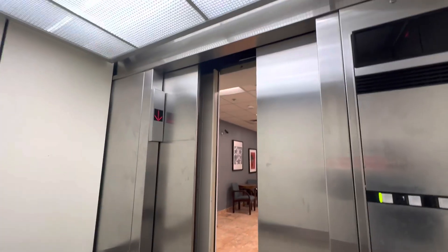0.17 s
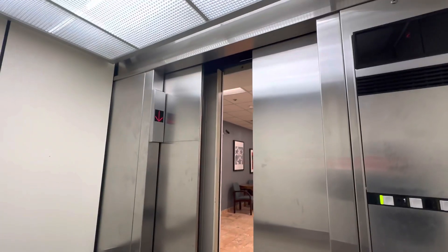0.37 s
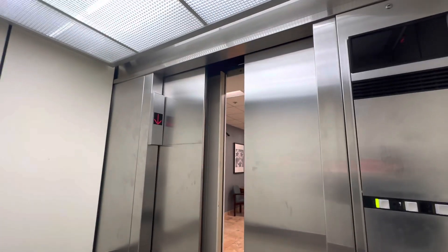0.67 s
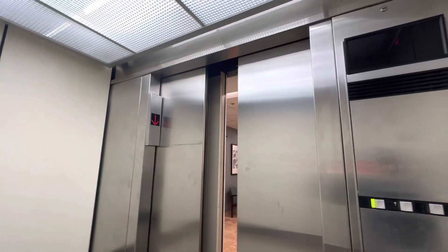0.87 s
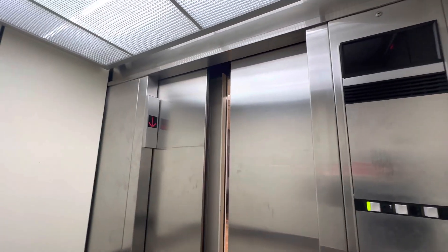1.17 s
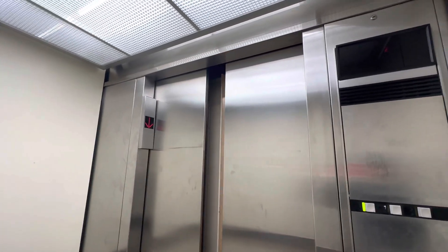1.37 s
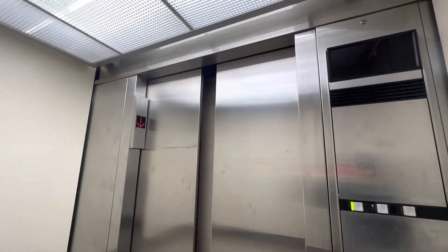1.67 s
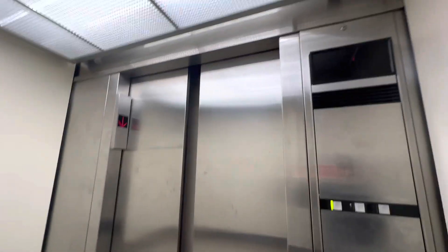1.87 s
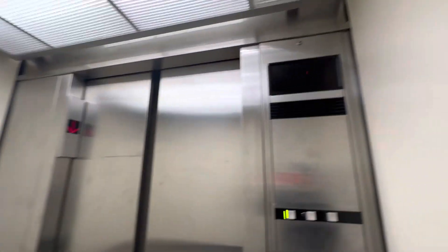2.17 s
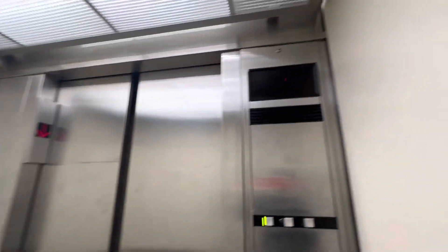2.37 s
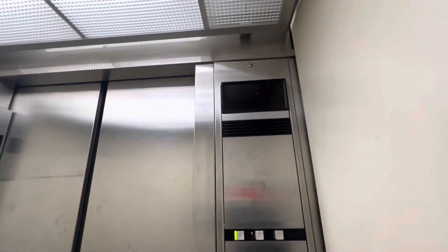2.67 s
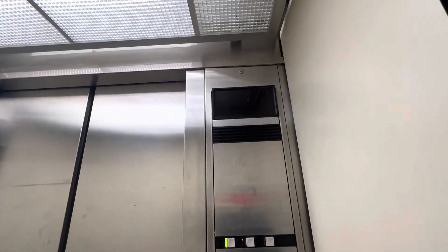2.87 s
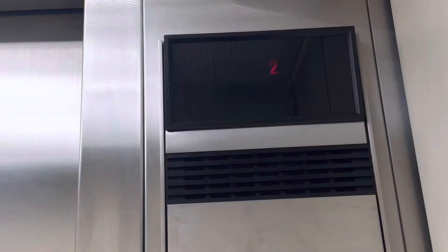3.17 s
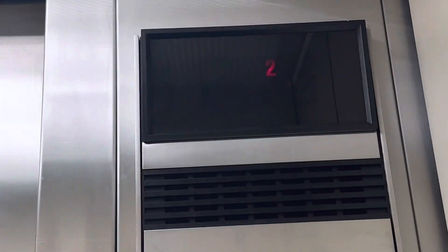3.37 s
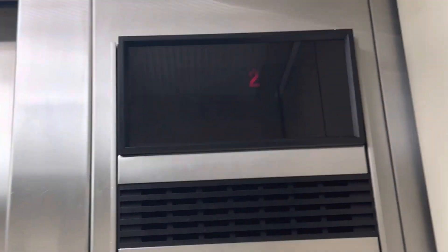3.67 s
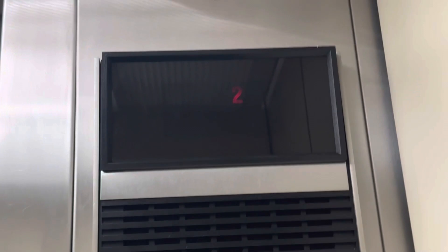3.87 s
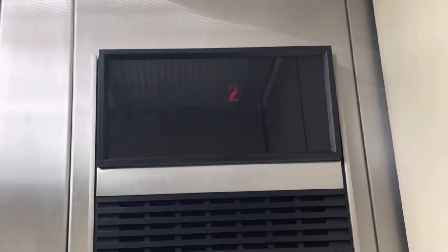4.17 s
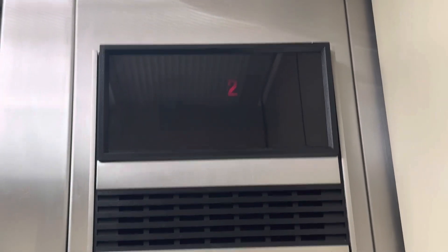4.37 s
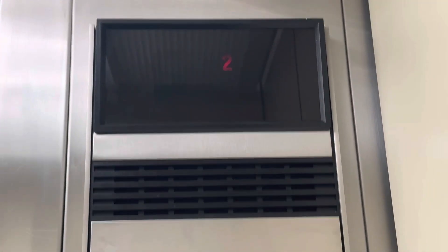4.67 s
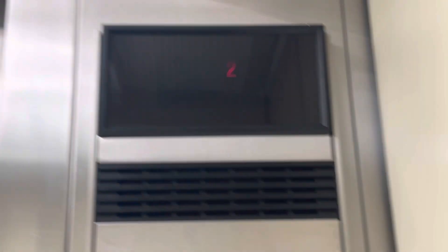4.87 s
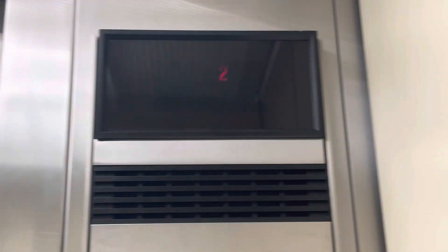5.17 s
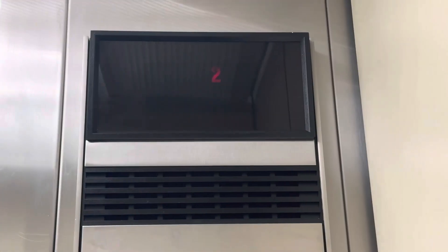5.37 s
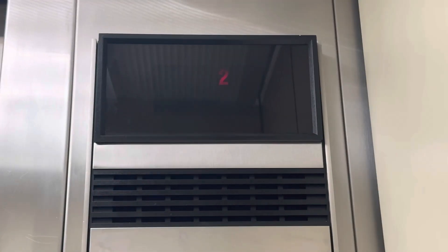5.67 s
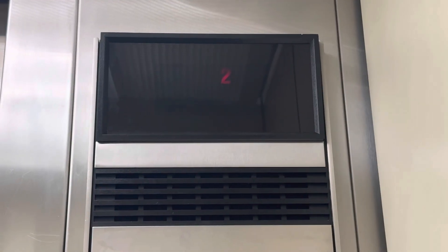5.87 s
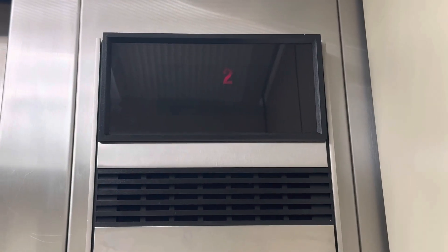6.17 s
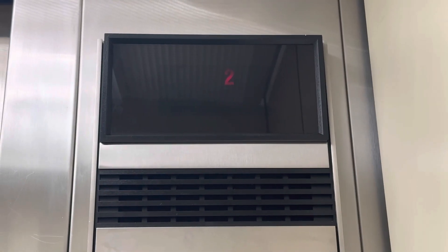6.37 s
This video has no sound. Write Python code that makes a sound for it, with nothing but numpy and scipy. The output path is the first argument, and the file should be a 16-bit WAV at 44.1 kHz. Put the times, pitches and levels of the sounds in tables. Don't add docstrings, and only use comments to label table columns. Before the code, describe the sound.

Close inside a small steel elevator cabin, a low wavering fan hum and airy rumble run throughout. The doors start with a thump, a thin dry squeak and loose rattles, then roll along with soft bumps and hiss. They scrape together and seal. A brake clicks, the car jolts with deep thuds, and faint smooth rail hiss rises and fades under the hum.

```python
import sys
import numpy as np
from scipy import signal
from scipy.fft import rfft, irfft, next_fast_len
from scipy.io import wavfile
from scipy.ndimage import map_coordinates

SR = 44100
rng = np.random.default_rng(int(sys.argv[2]) if len(sys.argv) > 2 else 0)


def wav_out(sig):
    wavfile.write(sys.argv[1], SR, np.round(np.clip(np.atleast_2d(sig).T, -1, 1) * 32767).astype(np.int16))


def field_ratio(decibels):
    return 10 ** (np.asarray(decibels, dtype=float) / 20)


N = 287091

# time in seconds, level in dB.
FAN = [(0, -38.5), (.22, -39), (1.96, -37), (2.32, -34), (2.43, -38.5), (2.76, -35.5), (3.08, -37.5),
       (3.99, -34.5), (4.13, -34), (4.28, -39), (4.46, -37), (4.9, -37), (5.37, -34.5), (5.62, -34),
       (5.84, -34), (6.2, -33.5), (6.51, -39.5)]
# multiple of the shaft rate, level in dB with the
# doors # open, level in dB with them shut.
SHAFT = [(6, -11.5, -13), (7, -17, -19), (10, -13, -12), (12, -26, -19), (13, -25, -24), (15, -23, -21),
         (16, -19.5, -27), (18, -25, -29), (22, -17, -33), (23, -29, -34), (24, -25, -33), (25, -29, -38),
         (28, -18.5, -21), (31, -30, -34), (29, -30, -35)]


def fan(wobble_db, spread):
    blades, blade_hz, shaft_db = 5, 121.98, -37.0
    blade_db, = in_time(FAN)
    open_share = sealing(late_s=0.12, fade_s=0.14)
    shaft_hz = (blade_hz + .3 * drift(1.5)) / blades
    turn = 2 * np.pi * np.cumsum(shaft_hz) / SR
    blade_level = field_ratio(blade_db + dip() + 2.9 * drift(9))
    out = blade_level * np.sin(blades * turn + .6 * drift(6)) * field_ratio([[-.6], [.6]])
    for order, open_db, shut_db in SHAFT:
        phase = rng.uniform(0, 2 * np.pi) + spread * (1 + order / 14) * drift(3.27)
        apart = order / 35 * np.array([[1], [-1]])
        order_db = shaft_db + shut_db + (open_db - shut_db) * open_share
        out += field_ratio(order_db + wobble_db * drift(4.2)) * np.sin(order * turn + phase + apart)
    return np.sqrt(2) * out


# time in seconds, depth in
# dB, half width in seconds.
DIPS = [
    (.25, -14, .06),
    (3.70, -5, .04),
    (3.79, -16, .045),
    (3.86, -9, .03),
]


def dip():
    t = np.arange(N) / SR
    return sum(db * np.exp(-((t - s) / width) ** 2) for s, db, width in DIPS)


# time in seconds, level in dB.
BOOM = [(0.0, -46.5), (0.34, -39), (2.27, -41), (2.41, -53), (2.48, -35), (2.68, -48), (3.01, -36),
        (3.12, -54.5), (3.17, -42), (3.61, -39), (3.81, -29), (3.83, -37), (4.46, -48), (4.53, -37.5),
        (5.33, -43), (5.73, -36), (6.46, -43), (6.51, -35)]
# time in seconds, level in dB.
LOAD = [(0, -53), (1.0, -54.5), (2.2, -49), (2.9, -46.5), (3.3, -51), (4.3, -49), (5.1, -44), (6.51, -47.5)]
# frequency in Hz, dB per Hz.
RUMBLE = [(18, -32), (30, -9.5), (50, -12), (70, -6), (93, 6.5), (108, -14.5), (135, -15), (160, -46)]
DRONE = [(120, -34), (145, -6.5), (165, -5), (195, -9.5), (225, 3.5), (242, -5), (258, -11), (275, -38)]
WALLS = [(240, -29), (268, 3.5), (280, -6), (295, 1), (325, -7.5), (360, 3), (385, -9.5), (430, -5),
         (465, -15), (500, -44.5)]
RUSH = [(400, -5.5), (450, -7), (600, -8), (700, -8.5), (950, -14), (1300, -13), (1800, -12), (2300, -20),
        (3500, -32.5), (7200, -43.5), (7450, -60), (7750, -51.5), (10000, -60), (10500, -84.5)]


def cabin():
    rumble_db, drone_db, rush_db = -40.5, -43.5, -50
    rumble_follows, drone_follows = 0.65, 0.4
    leak_db = -2
    swell_db, = in_time(BOOM)
    walls_db, = in_time(LOAD)
    boom_db = rumble_db + rumble_follows * (swell_db - swell_db.mean()) + dip()
    floor_db = drone_db + drone_follows * (walls_db - walls_db.mean())
    out = field_ratio(rush_db + leak_db * sealing(late_s=0.16, fade_s=0.16)) * noise(RUSH, SHUT)
    for db, spectrum in ((boom_db, RUMBLE), (floor_db, DRONE), (walls_db, WALLS)):
        out += field_ratio(db + 1.2 * drift(3.5)) * noise(spectrum, SHUT)
    return out


# time in seconds, level in dB.
DOORS = [(0, -59.5), (.74, -58.5), (.97, -64), (1.86, -69.5), (2.22, -55.5), (2.4, -53), (2.55, -58),
         (2.7, -65.5), (3.1, -72.5)]
# dB at mean pressure, share of the pressure swing followed.
DOOR_BANDS = [(-0.5, 0.74), (-7, 0.79), (-32, 1.6)]
# peak time in seconds, peak in dB, brightness in dB, rise in
# seconds, 60 dB decay in seconds.
RATTLES = [(.11, -58, -1, .021, .13), (.215, -59, -2, .005, .087), (.26, -52, 1.5, 0.0045, 0.13),
           (.332, -56, -3, 0.027, 0.1), (.4, -57, -7, .01, 0.19), (.555, -51.5, -8.5, 0.037, 0.44),
           (.83, -56, -17, 0.037, 0.33), (.982, -58.5, -4.5, 0.0075, 0.29), (1.235, -63, -2, 0.017, 0.36),
           (1.302, -56, -8, .0044, 0.17), (1.615, -53.5, -16, 0.0096, 0.25), (1.83, -71, 8, .002, 0.19),
           (1.87, -64.5, -6, .012, .15), (2.335, -68, 9, .005, 0.42), (2.567, -69, 9, .004, 0.23)]
# time in seconds, level in dB re the mean.
ROLLING = [(0, -0.5), (.5, -1.5), (1.3, -0.5), (2.0, -1), (2.5, -1.5), (2.65, -3), (3.1, -2)]
# peak time in seconds, peak in dB, rise in seconds, 60 dB decay in seconds.
SPIT = [
    (2.335, -64, .006, 0.22),
    (2.58, -80, .004, .15),
    (1.26, -81, .03, .3),
    (.985, -79, .01, .2),
]
# frequency in Hz, dB per Hz.
ROLLERS = [(150, -27), (250, -22), (400, -4.5), (550, -2), (800, -4), (1100, -5.5), (1500, -11.5),
           (2200, -16.5), (2900, -17), (3300, -47)]
TRACK = [(2000, 2.5), (3000, -1.5), (4500, -2.5), (7000, -5), (7800, -15)]
EDGE = [(6700, -28), (7400, 0.5), (9000, -1), (10200, -6), (11300, -17), (12300, -35)]
DOOR_TOP = [(11800, -30), (12400, -13), (13200, -10), (14000, -2), (14600, -1), (15500, 3), (15750, 2),
            (15900, -30)]
TOP = [(12200, -30), (12700, -2), (14000, -2), (15500, 3.5), (15750, 2), (15900, -30)]
# frequency in Hz, side over mid in dB, left over right in dB.
OPEN = [(60, -9, -19), (195, 33.5, 0.5), (415, 5.5, 10.5), (760, 2.5, 1.5), (1510, 2.5, 7.5),
        (3000, 1, 2.5), (6000, 0.5, 5.5), (8000, 0.5, 3.5), (9500, 0, -9.5), (11500, 1.5, -16.5),
        (12500, 0, -2), (13300, -5, 2), (13700, -29, 0)]


def doors():
    rolling = field_ratio(-45.5 + in_time(ROLLING)[0]) * noise(ROLLERS, OPEN)
    track_level, edge_level, top_level = friction(DOORS, DOOR_BANDS, RATTLES)
    rub = track_level * noise(TRACK, OPEN) + edge_level * noise(EDGE, OPEN)
    top = top_level * noise(DOOR_TOP, OPEN)
    top += np.sqrt(bursts(SPIT)) * noise(TOP, SHUT)
    out = patchy(rub, depth_db=3.0, span_s=.06, span_hz=300)
    out += patchy(rolling, depth_db=1.2, span_s=.09, span_hz=150)
    out += patchy(top, depth_db=4.5, span_s=.035, span_hz=600)
    return out * sealing()


def sealing(late_s=0, fade_s=0.018):
    sealed_s = 3.05
    return np.clip((sealed_s + late_s - np.arange(N) / SR) / fade_s + .5, 0, 1)


# crest
# time in seconds, peak in dB, frequency in Hz, rise in seconds, 60 dB decay in seconds.
JOLTS = [(.233, -28, 160, .009, .07), (.2562, -30, 185, .012, .1), (.26, -33, 80, .02, .2),
         (.2562, -20.5, 146, .016, .1), (.297, -27, 150, .007, .08), (.313, -33, 90, .008, .12),
         (3.695, -27, 105, .008, .15), (3.7695, -21, 108, .006, .15), (3.8025, -20.5, 92, .008, .1),
         (3.852, -25.5, 122, .007, .07), (3.867, -24, 91, .006, .11), (3.7285, -35, 355, .014, .12),
         (3.731, -30, 145, .01, .08), (3.7605, -30, 215, .01, .12), (3.72, -34, 55, .04, .5),
         (3.79, -40, 355, .012, .15), (3.815, -36, 250, .015, .2), (.36, -51, 2335, .02, .45),
         (.435, -56, 2680, .02, .2), (1.4105, -39, 700, .001, .05), (3.666, -40, 1620, .004, .06),
         (3.664, -48, 1250, .002, .1), (3.668, -46, 700, .004, .1), (3.68, -45, 520, .006, .15),
         (3.663, -48, 2250, .002, .06), (3.675, -47, 1872, .003, .13), (3.9, -37, 45, .04, .5)]
CLICKS = [
    (1.8295, -58, 7600, .0008, .012),
    (1.8295, -58, 10100, .0008, .012),
    (1.8295, -72, 13500, .0006, .008),
    (3.6648, -59, 9800, .0006, .012),
    (1.9, -61, 4500, .001, .02),
    (1.8, -62, 4000, .001, .03),
    (.554, -53, 8300, .003, .05),
    (.55, -58, 6700, .004, .05),
    (.555, -63, 8500, .003, .05),
]
# start in seconds, peak in dB, frequency in Hz.
BUMPS = [(0.72, -31.5, 700), (0.803, -38, 915), (0.887, -34, 540), (1.024, -38, 584), (1.077, -36, 463),
         (1.169, -35, 452), (1.409, -35, 1004), (1.528, -34, 686), (1.594, -36, 544), (1.66, -38, 613),
         (1.76, -39, 452), (1.821, -38, 506), (1.897, -36, 554), (1.979, -38, 549), (2.061, -34, 528),
         (2.252, -37, 530), (2.355, -38, 678), (2.429, -36, 690), (2.639, -39, 690), (2.722, -35, 676),
         (2.836, -37, 606), (2.924, -39, 536)]


def jolts():
    bump_db, bump_rise_s, bump_t60_s = -5, 0.00501, 0.074
    t, out = np.arange(N) / SR, np.zeros((2, N))
    bumps = [(s + bump_rise_s, db + bump_db, hz, bump_rise_s, bump_t60_s) for s, db, hz in BUMPS]
    for rows, left_db in ((JOLTS, -.5), (CLICKS, -2.0), (bumps, 1.5)):
        pan = field_ratio([[left_db], [-left_db]])
        for s, db, hz, rise, t60 in rows:
            near = slice(max(int((s - .2) * SR), 0), int((s + .6) * SR))
            level = np.sqrt(bursts([(s, db, rise, t60)], t[near]))
            out[:, near] += pan * level * np.cos(2 * np.pi * hz * (t[near] - s))
    return out


# time in seconds, frequency in Hz, level in dB.
SQUEAL = [(.19, 2860, -80), (.215, 2860, -56), (.24, 2830, -66), (.256, 2830, -53), (.29, 2795, -49),
          (.30, 2780, -57), (.335, 2890, -55), (.345, 2810, -58), (.357, 2800, -49), (.385, 2770, -75)]
SQUEAL_HIGH = [(.26, 2920, -75), (.28, 2960, -58), (.305, 3040, -56), (.318, 3030, -63), (.335, 3020, -53),
               (.352, 2980, -56), (.365, 2960, -75)]


def squeal():
    unsteady, flicker_db, out = drift(50), 2.6 * drift(60), 0
    apart = np.array([[.4], [-.4]])
    for rows in (SQUEAL, SQUEAL_HIGH):
        hz, db = in_time(rows)
        phase = 2 * np.pi * np.cumsum(hz) / SR
        out = out + field_ratio(db + flicker_db) * np.sin(phase + unsteady + apart)
    return np.sqrt(2) * out


# peak time in seconds, peak in dB, rise in
# seconds, 60 dB decay in seconds.
SQUEAKS = [
    (.08, -58.5, .1, .5),
    (.21, -55, .03, .3),
    (.265, -51, 0.013, 0.44),
    (.34, -56, 0.034, 0.34),
    (.44, -57, 0.046, 0.28),
]
SCRAPES = [
    (2.405, -43.5, .035, .2),
    (3.666, -48.5, .005, .7),
]
# frequency in Hz, width in Hz, level in dB.
SQUEAK = [(2770, 48, 1), (2850, 30, 0), (2860, 35, -6), (3040, 55, 0)]
SCRAPE = [(843, 260, 6), (1480, 410, 4.5), (1980, 390, -0.5), (2390, 500, -1.5)]


def rubs():
    slips = rng.standard_normal((2, N)) * (rng.random(N) < 1600 / SR)
    squeaks = np.sqrt(bursts(SQUEAKS)) * resonate(slips, SQUEAK)
    scrapes = np.sqrt(bursts(SCRAPES)) * resonate(slips, SCRAPE)
    return squeaks + scrapes * field_ratio(1)


# peak time in seconds, peak in dB, frequency in Hz.
PANEL = [(.115, -62, 9500), (.115, -74, 7000), (.262, -61, 8670), (.262, -71, 3900), (.27, -63, 2803),
         (.33, -72, 8500), (.335, -64, 3000), (.355, -64, 2790), (.37, -75, 2330), (.445, -60, 2660),
         (.55, -60, 2340), (.553, -68, 8000), (.553, -75, 9230), (.56, -64, 6580), (.56, -66, 4400),
         (.83, -69, 8750), (.83, -71, 5700), (.83, -72, 4500), (.985, -69, 7900), (.985, -69, 6730),
         (1.236, -64, 7140), (1.305, -64, 8110), (1.62, -69, 8500), (2.385, -64, 1440),
         (2.412, -52.5, 2065), (3.665, -71, 9150), (3.667, -68, 7040), (3.68, -77, 8500), (3.69, -51, 1755)]


def panels():
    t, out = np.arange(N) / SR, 0
    unsteady = .9 * drift(30)
    causes = RATTLES + TICKS + SCRAPES[:1]
    for (s, db, hz), place in zip(PANEL, rng.standard_normal((len(PANEL), 2))):
        cause = min(causes, key=lambda row: abs(row[0] - s))
        level = np.sqrt(2 * bursts([(s, db, *cause[-2:])]))
        pan = field_ratio(2.2 * place[0] * np.array([[1], [-1]]))
        phase = 2 * np.pi * hz * t + unsteady * (1 + hz / 6000) + .5 * place[:, None]
        out = out + level * pan * np.sin(phase)
    return out


# time in seconds, level in dB.
SHOES = [(3.05, -81.5), (3.64, -81), (3.85, -74), (4.32, -76), (4.39, -69), (4.6, -63.5), (5.12, -71),
         (5.45, -80), (5.9, -81), (6.51, -82.5)]
# dB at mean pressure, share of the pressure swing followed.
SHOE_BANDS = [(-0.5, 0.99), (-4, 1.14), (-20.5, 2.1)]
# peak time in seconds, peak in dB, brightness in dB, rise in seconds,
# 60 dB decay in seconds.
TICKS = [
    (3.18, -77, -9, .005, .3),
    (3.664, -66, 2.5, 0.00079, .2),
    (3.96, -67, -8, 0.038, .3),
    (4.03, -71.5, -0.5, 0.095, 0.49),
    (4.3, -69.5, 0, 0.013, 0.89),
]
# frequency in Hz, dB per Hz.
SHOE_LOW = [(2500, -36), (3200, 1.5), (5000, -0.5), (7100, -0.5), (7350, -34.5)]
SHOE_MID = [(7500, -34), (7750, -1), (9300, -6), (10000, -9), (10400, -41.5)]


def shoes():
    levels = friction(SHOES, SHOE_BANDS, TICKS)
    spectra = (SHOE_LOW, SHOE_MID, TOP)
    out = sum(level * noise(spectrum, SHUT) for level, spectrum in zip(levels, spectra))
    return out * (1 - sealing())


# peak time in seconds, peak in dB, rise in seconds, 60 dB decay in seconds.
SHUDDERS = [
    (.26, -42, .08, .8),
    (3.62, -44, .03, .4),
    (3.76, -41, .05, .9),
]
# frequency in Hz, dB per Hz.
FRAME = [(16, -20), (24, 0), (40, 0), (65, -2), (85, -25)]


def shudder():
    return np.sqrt(bursts(SHUDDERS)) * noise(FRAME, SHUT)


# frequency in Hz, dB per Hz.
AIR = [(12200, -25.5), (12500, -3), (13500, -0.5), (14400, -0.5), (14700, -30)]


def air():
    return field_ratio(-96 + 1.5 * drift(4)) * noise(AIR, SHUT)


def friction(pressure, bands, hits):
    db, = in_time(pressure)
    mean_db = np.mean(np.array(pressure)[:, 1])
    low = bursts(hits)
    middle = bursts([(s, peak + bright, rise, t60) for s, peak, bright, rise, t60 in hits])
    top = middle * field_ratio(2 * -16)
    return [np.sqrt(field_ratio(mean_db + offset + share * (db - mean_db)) ** 2 + power)
            for (offset, share), power in zip(bands, (low, middle, top))]


def bursts(rows, t=None):
    t, out = np.arange(N) / SR if t is None else t, 0
    for s, db, *_, rise, t60 in rows:
        age = t - s
        fall_db = np.where(age > 0, 60 * age / t60, 9 * (age / rise) ** 2)
        out = out + field_ratio(db - np.minimum(fall_db, 200)) ** 2
    return out


def patchy(x, depth_db, span_s, span_hz):
    hz, t, cells = signal.stft(x, SR, nperseg=512)
    coarse = rng.standard_normal((200, 400))
    grid = np.meshgrid(hz / max(span_hz, 150), t / max(span_s, .02), indexing="ij")
    patches_db = depth_db * map_coordinates(coarse, grid, order=1)
    return signal.istft(cells * field_ratio(patches_db), SR, nperseg=512)[1][:, :N]


def resonate(x, modes):
    out = 0
    for hz, width, db in modes:
        r = np.exp(-np.pi * width / SR)
        b, a = [1 - r, 0, r - 1], [1, -2 * r * np.cos(2 * np.pi * hz / SR), r * r]
        once = signal.lfilter(b, a, x)
        out = out + field_ratio(db) * signal.lfilter(b, a, once)
    return out / out.std()


# frequency in Hz, side over mid in dB, left over right in dB.
SHUT_IMAGE = [(60, -25, -1), (110, -25.5, -2), (200, -29.5, -3), (390, -1.5, -2), (690, 1, 3),
               (1000, -5, 0.5), (1550, -2, -4.5), (1950, -3.5, -3), (2370, -13.5, 0),
               (3450, -12.5, 0), (3600, -45, 0), (6700, -35, 0), (6950, -9, 0), (7250, -9, 0), (7450, -25, 0),
              (7700, -8, 0), (8300, -16, 0), (9100, -11, 0), (10200, -6, 0), (10500, -25, 0),
              (12300, -20, 0), (12700, -5, 0), (13300, -40, 0)]
SHUT = SHUT_IMAGE
# frequency in Hz, lead of the right in radians.
LEAD = [(200, 0), (330, -.4), (400, -3.2), (600, -5.2), (850, -6.6), (1000, -6), (1500, -3.3), (1800, -2.8),
        (2000, -.55), (3400, -.55), (3650, 0), (6800, 0), (7450, -3.14), (8300, -6.28), (8900, -6.28),
        (10400, -3.14), (12300, -3.14), (13300, 0)]


def noise(spectrum, image):
    size = next_fast_len(N)
    hz = np.arange(size // 2 + 1) * SR / size + 1e-3
    gain = field_ratio(at_hz(spectrum, hz)) * (hz > spectrum[0][0]) * (hz < spectrum[-1][0])
    ripple = np.interp(hz / 18, np.arange(1300), rng.standard_normal(1300))
    gain *= field_ratio(2.5 * np.clip(hz / 800 - .5, 0, 1) * ripple)
    mid, side = rfft(rng.standard_normal((2, size))) * gain
    side = side * field_ratio(at_hz(image, hz))
    lead = at_hz(LEAD, hz) * (image is SHUT)
    lean = field_ratio(at_hz(image, hz, axis=2) / 2) * np.exp(-.5j * lead)
    out = irfft([(mid + side) * lean, (mid - side) / lean], size)[:, :N]
    return out / out.mean(axis=0).std()


def at_hz(points, hz, axis=1):
    points = np.array(points)
    return np.interp(np.log(hz), np.log(points[:, 0]), points[:, axis])


def in_time(rows):
    s, *columns = np.transpose(rows)
    return [np.interp(np.arange(N) / SR, s, c, left=-150, right=-150) for c in columns]


def drift(rate):
    r = np.exp(-80 * np.pi * rate / SR)
    slow = signal.lfilter([1], [1, -2 * r, r * r], rng.standard_normal(N // 40 + 2002))[2000:]
    return np.interp(np.arange(N) / 40, np.arange(len(slow)), slow / slow.std())


def scene():
    hum = fan(wobble_db=2.5, spread=0.35) + cabin()
    closing = doors() + squeal() + rubs()
    return hum + closing + jolts() + panels() + shoes() + shudder() + air()


def low_pass(x):
    return signal.sosfilt(signal.butter(12, 16710, fs=SR, output="sos"), x)


def record(dry):
    mix = dry * np.clip(np.arange(N) / (.004 * SR), 0, 1)
    return low_pass(mix)


dry = scene()
out = record(dry)
wav_out(out)
```